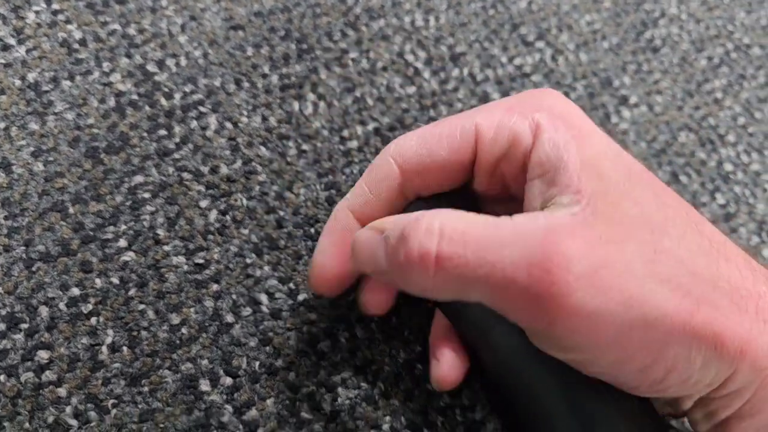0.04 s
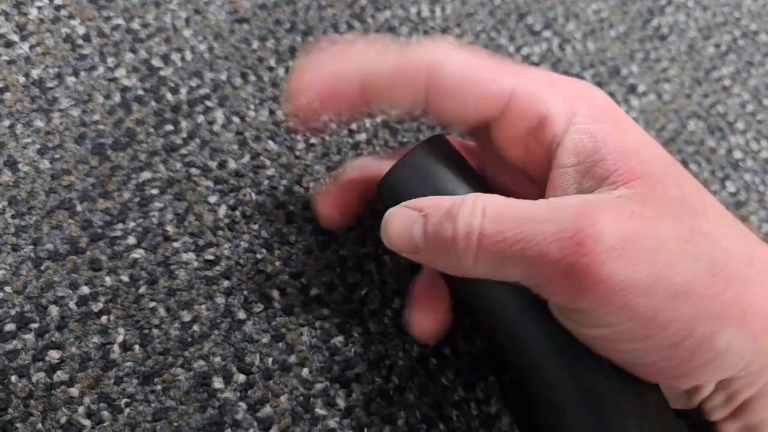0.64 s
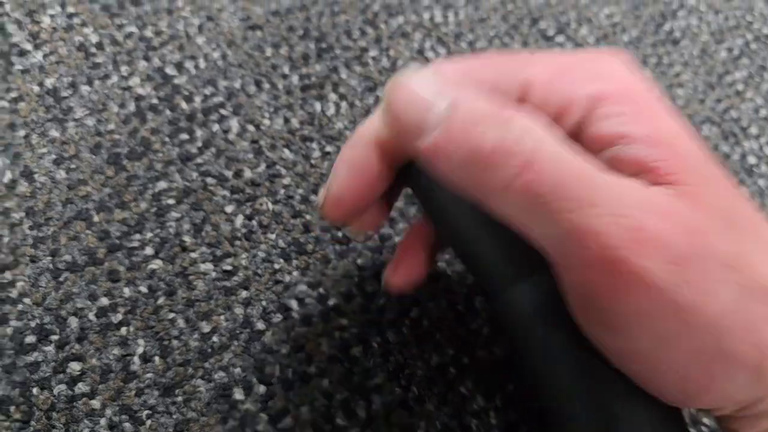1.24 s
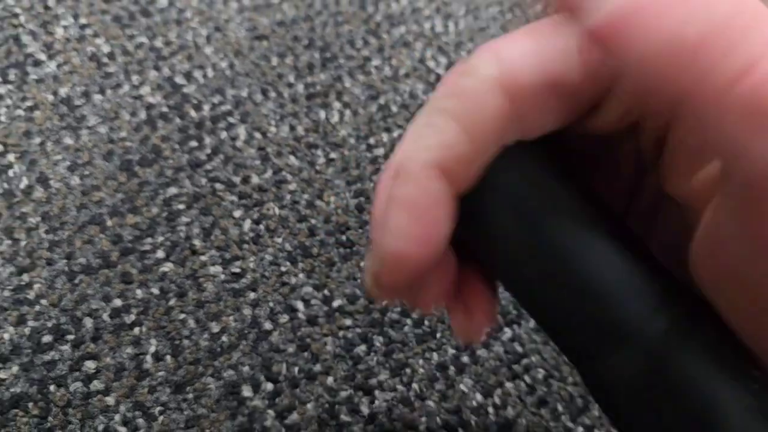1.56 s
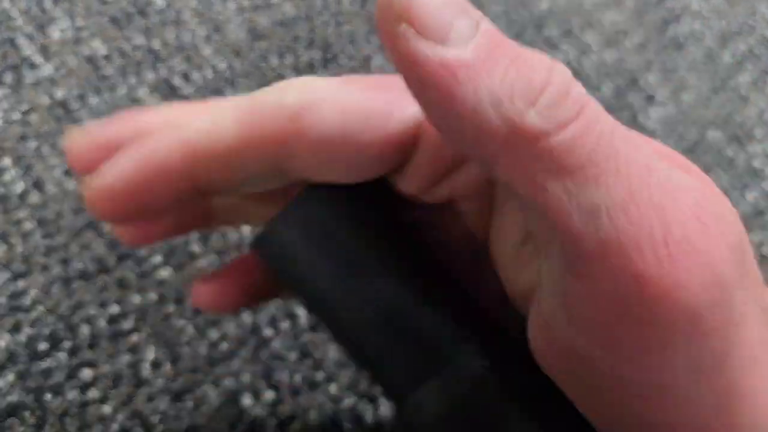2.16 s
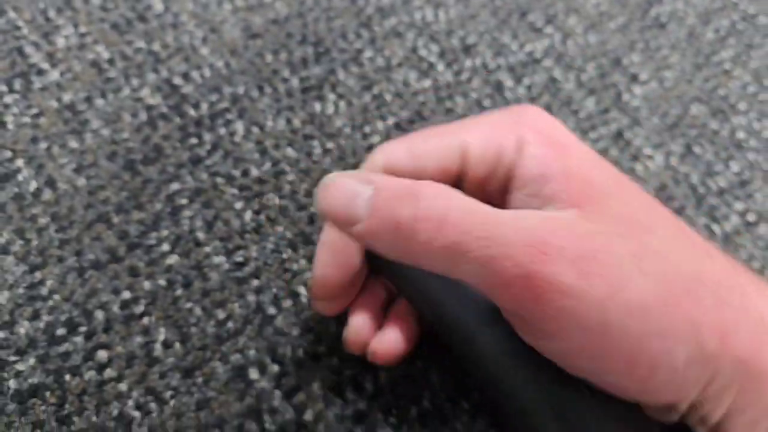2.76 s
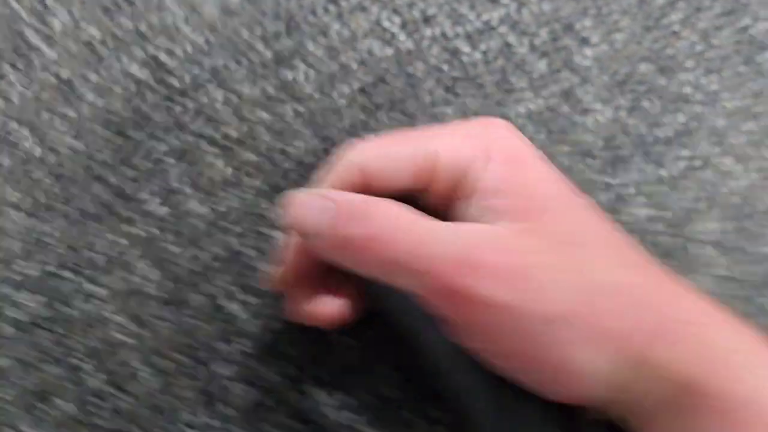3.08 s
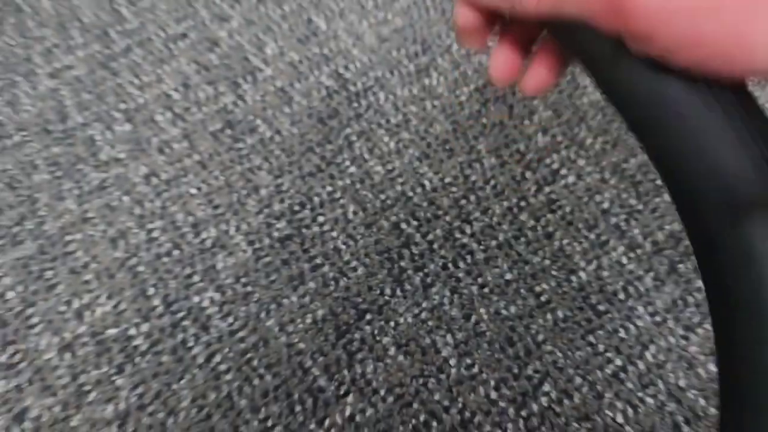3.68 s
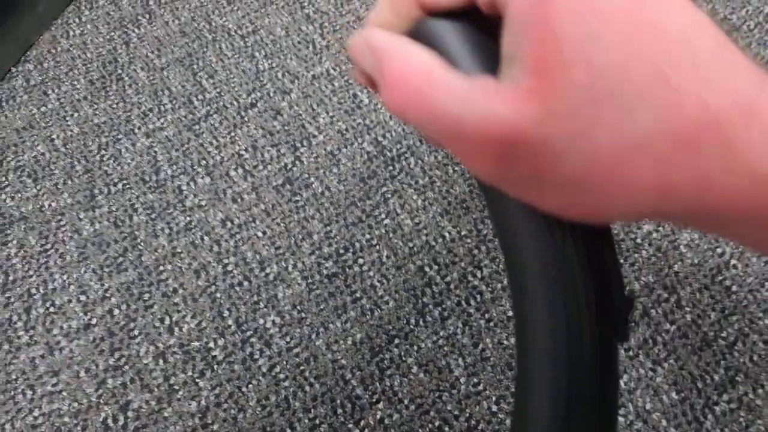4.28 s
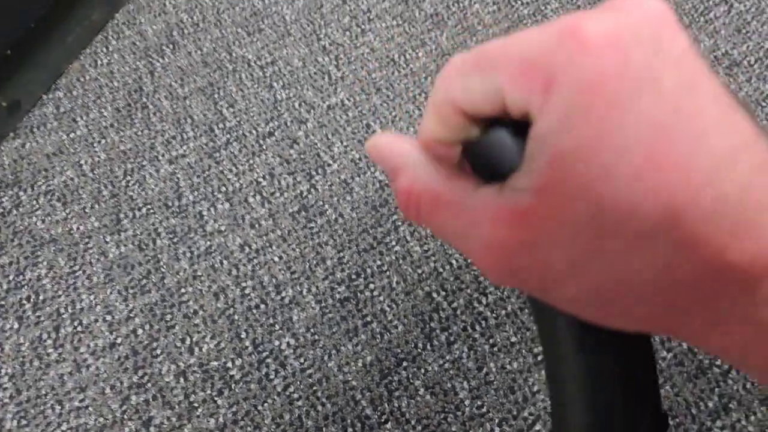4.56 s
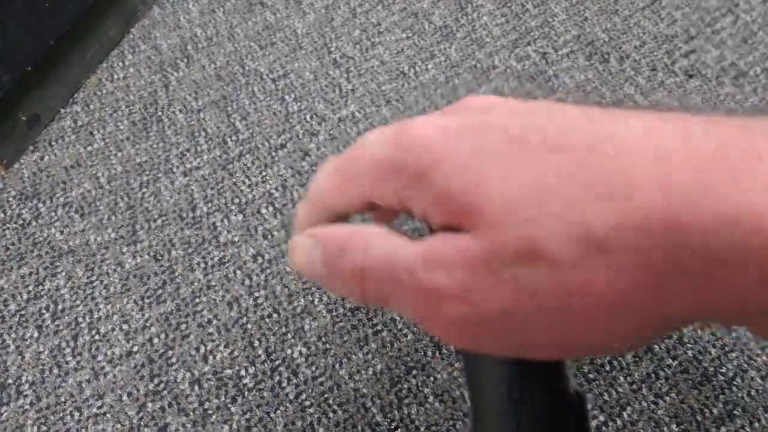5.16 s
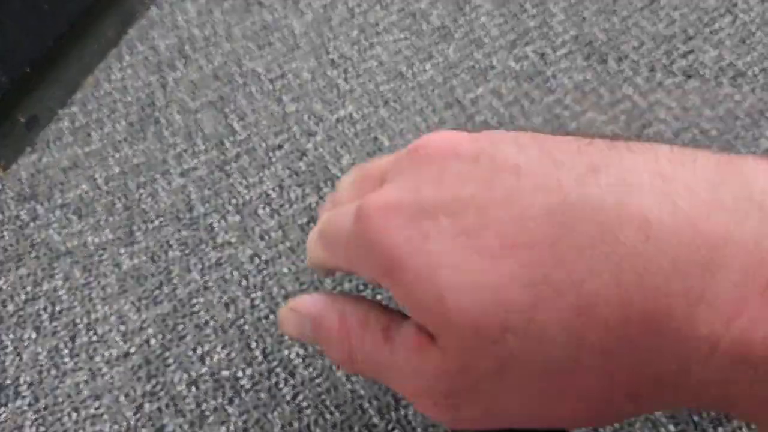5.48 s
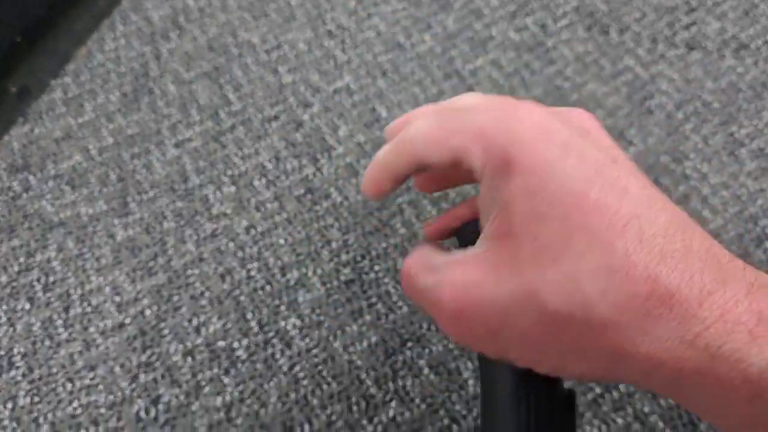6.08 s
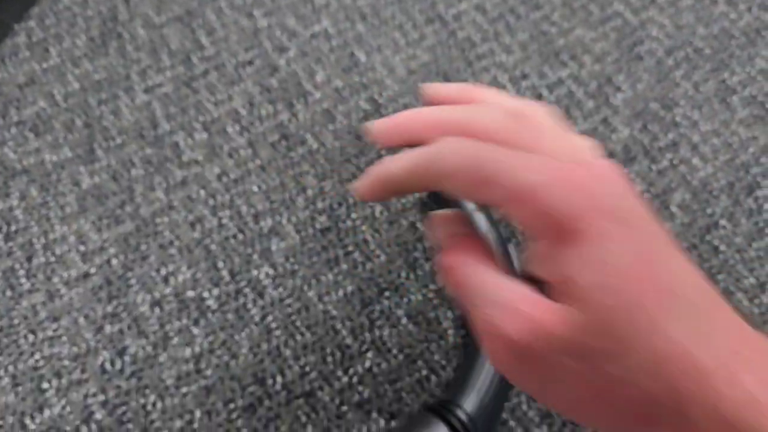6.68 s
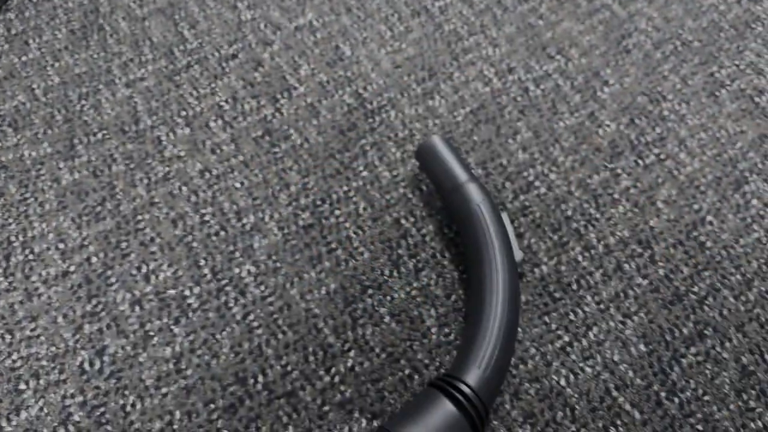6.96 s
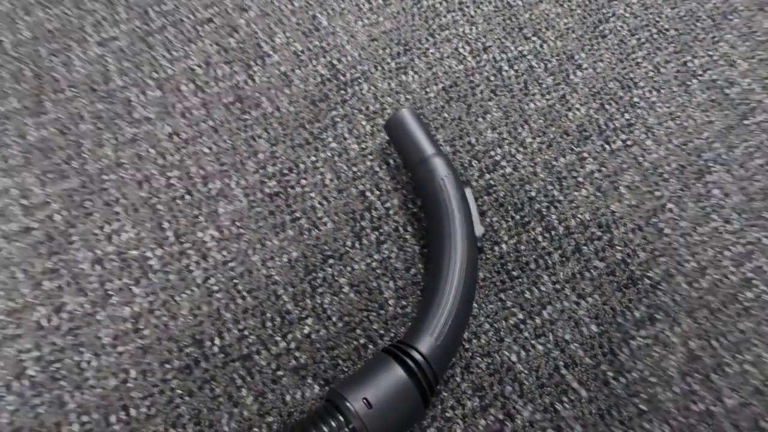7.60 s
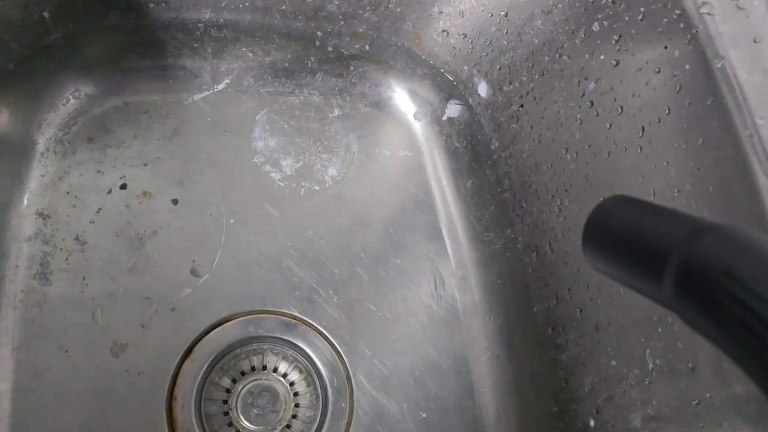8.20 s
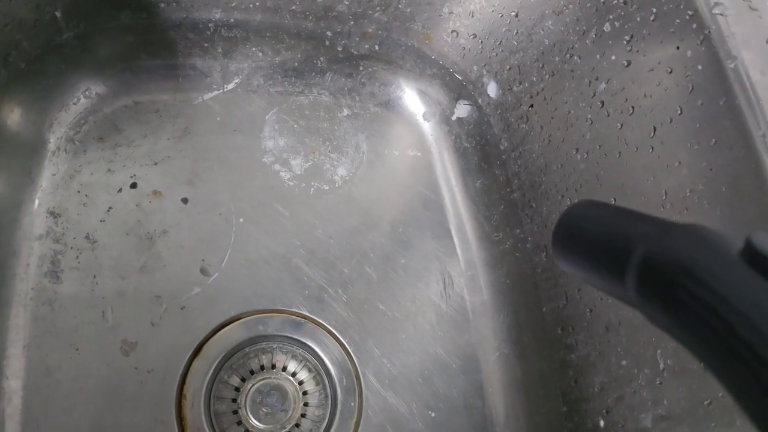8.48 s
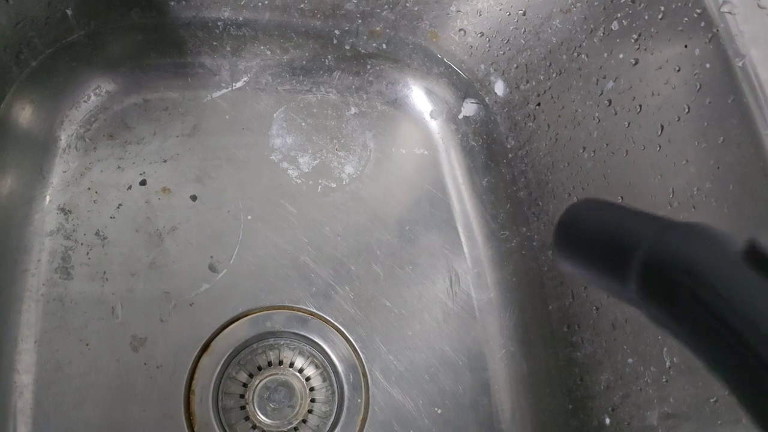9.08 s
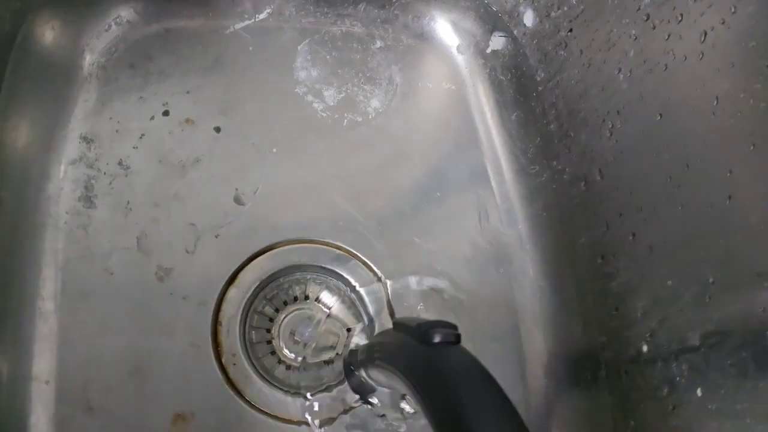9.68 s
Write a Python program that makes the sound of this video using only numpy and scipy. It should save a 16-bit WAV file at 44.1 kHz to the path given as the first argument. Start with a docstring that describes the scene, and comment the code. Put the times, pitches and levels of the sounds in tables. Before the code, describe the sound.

Air sizzles between fingers on a vacuum nozzle while the motor's hum rises and falls, before the open hose roars and gulps water.

```python
"""A wet-dry vacuum cleaner hums and hisses in a carpeted room as a hand covers and frees its nozzle.
Starved of air, the motor speeds up and its hum rises and swells. Air sizzles, hisses, rushes and
squeals through gaps between the fingers, the hose flutters, and the palm slaps onto the opening.
Then, abruptly, the open hose roars over a steel sink, with thin steady tones in its hiss, and dips
into the water at the drain, where it slurps and gulps."""
import sys
import numpy as np
from scipy import signal
from scipy.fft import rfft, irfft, next_fast_len
from scipy.io import wavfile
from scipy.ndimage import map_coordinates

SR = 44100
rng = np.random.default_rng(int(sys.argv[2]) if len(sys.argv) > 2 else 0)


def persist_wave(psi):
    """Save psi, clipped to +-1, as 16-bit WAV."""
    counts = np.round(np.clip(psi, -1, 1) * 32767).astype(np.int16)
    wavfile.write(sys.argv[1], SR, np.atleast_2d(counts).T)


N = 438354

HAND_OFF_S, SINK_S, DIP_S = 6.375, 7.74, 9.5  # the hand leaves, the sink begins, the nozzle meets water
OPEN_HZ, SEALED_HZ = 635, 720  # pitch of the hum with the nozzle open and sealed

# The hand, and last the water, blocks or frees the nozzle: (time [s], share closed from then on [0-1])
BLOCKAGES = [(0.0, 0.225), (0.064, 0.91), (0.509, 0.035), (0.819, 0.9), (0.92, 0.795), (1.33, 0.924),
             (2.129, 0.042), (2.583, 0.919), (4.639, 0.016), (5.054, 0.723), (5.193, 0.278), (5.316, 0.708),
             (5.561, 0.127), (5.9, 0.234), (6.32, 0.0), (9.616, 0.95)]
# Standing waves, the room's loud and quiet spots, make the hum depend on its pitch. Balance is left
# level minus right; lead is how far left runs ahead: (pitch [Hz], level [dB], balance [dB], lead [rad])
ROOM_WAVES = [(635.0, -33.8, 3.2, 1.5), (644.0, -26.0, 3.9, 0.4), (652.0, -28.4, -2.7, 0.1),
              (658.0, -25.9, -1.5, -0.3), (664.0, -26.3, -1.4, 0.2), (669.0, -28.5, -4.9, -0.2),
              (674.0, -25.1, -11.7, -0.1), (682.0, -23.5, -2.9, 0.8), (688.0, -24.3, 2.3, -0.1),
              (694.0, -25.0, -5.0, -0.6), (700.0, -21.8, -6.5, -0.4), (704.0, -23.6, -5.7, 0.1),
              (708.0, -18.4, -5.2, -0.3), (713.0, -16.7, -1.0, -0.8)]
# The microphone drifts through them: (time [s], added level [dB], added balance [dB], added lead [rad])
MIC_DRIFT = [(0.0, 0.2, 0, -0.57), (0.45, 2.7, 1.67, -0.52), (1.0, -5.54, -0.32, -0.69),
             (1.4, 2.8, 0.53, -0.3), (2.0, 1.7, -1.92, 0.75), (2.6, -5.5, 0.24, -0.85),
             (3.1, 3.5, -3, 0.49), (3.45, 7.78, -0.7, 0.6), (3.9, 1.52, -3.81, -0.04),
             (4.6, -0.91, 2.39, 0.22), (5.4, 1.3, 0, 0.13), (5.9, -2.5, 3, 0.06), (6.4, -1, 0, 0.27),
             (6.8, -3, 0.24, 0.072), (7.7, 1.7, 0.75, -0.04)]
# The hum dips briefly: (time [s], half length [s], depth [dB])
HUM_DIPS = [(0.524, 0.039, -14), (4.787, 0.013, -17), (4.995, .05, -9.5), (5.79, 0.015, -10),
            (6.373, 0.064, -9)]
# A tone an octave above the hum builds until the seal breaks: (time of break [s], peak level [dB])
OCTAVE_PEAKS = [(2.06, -39), (4.56, -43.5)]
# Higher tones in the hum; the twelfth comes from the motor's spinning contacts, the commutator:
# (multiple of the pitch, base level by the carpet [dB], base level by the sink [dB])
OVERTONES = [(3, -58.5, -51), (12, -59, -54)]
# Air leaks between hand and nozzle: (start [s], end [s], rush of a wide gap [dB],
# hiss of a narrow gap [dB], sizzle of a pinhole [dB], balance of the sizzle [dB])
FINGER_GAPS = [(0.0, 0.423, -37, -36, -34.5, -2), (0.416, 0.492, -37, -33, -16.5, 12),
               (0.496, 0.571, -23.5, -22.5, -28, 10), (0.566, 0.744, -32.5, -33, -35, 8),
               (0.84, 0.943, -40, -36, -29, 3), (0.935, 1.06, -45, -30.5, -19.5, 13),
               (1.142, 1.254, -56, -35, -27, 4), (2.078, 2.261, -23, -23, -22, 19),
               (2.27, 2.376, -33, -36, -42, 10), (2.447, 2.544, -29.5, -21.5, -21.5, 3),
               (3.93, 4.45, -45, -44, -32, 5), (4.056, 4.25, -48, -44, -28.5, 11),
               (4.552, 4.65, -29, -23, -20, 9), (4.618, 4.722, -21.5, -24, -26, 7),
               (4.728, 4.907, -30, -39.5, -52, 4), (4.895, 4.946, -25, -27.5, -34, 5),
               (5.114, 5.235, -28, -27.5, -32, 4), (5.248, 5.47, -48, -39.5, -35, 2),
               (5.47, 5.58, -29, -25.5, -32, 9), (5.56, 6.225, -23.5, -27, -32.5, 10),
               (5.644, 5.678, -20, -38, -42, 5), (5.747, 5.916, -21.5, -27.5, -37, 5),
               (6.07, 6.158, -44, -35, -26, 8), (6.182, 6.215, -23.5, -40, -36, 6),
               (6.227, 6.373, -29.5, -33.5, -44, 3)]
# The bare nozzle turns toward the microphone: (time [s], rush [dB], hiss [dB], sizzle [dB])
BARE_NOZZLE = [(6.45, -33.5, -54, -58), (7.0, -32.5, -51, -54), (7.72, -30.5, -43.5, -45)]
# Slits between the fingers almost whistle:
# (start [s], end [s], first pitch [Hz], last pitch [Hz], band width [Hz], level [dB], balance [dB])
SQUEALS = [(0.022, .95, 6340, 6400, 350, -40.5, 0), (.05, .42, 14800, 14000, 1500, -33, -3),
           (1.3, 2.08, 13400, 14900, 1400, -33.5, -5), (2.92, 3.2, 13600, 13000, 900, -39, -6),
           (3.3, 3.92, 14200, 14800, 1200, -38, -11), (3.95, 4.3, 13000, 13500, 1400, -32, 6),
           (0.432, 0.573, 7480, 4900, 1200, -19.5, 3), (0.96, 1.09, 14900, 13100, 1600, -15.5, 14),
           (2.109, 2.28, 1850, 1530, 380, -21.5, 24), (2.268, 2.48, 2220, 2170, 220, -32, 9),
           (2.465, 2.568, 2264, 2120, 260, -23.5, 5), (4.613, 4.759, 3300, 2013, 1100, -22, 8),
           (4.96, 5.03, 7500, 7400, 500, -36, 5), (5.11, 5.373, 7500, 7130, 600, -29.5, 5),
           (5.1, 5.5, 12600, 12100, 800, -35, 3), (6.17, 6.23, 3550, 3430, 500, -27, 8),
           (5.744, 5.831, 1930, 1884, 220, -17, 10), (5.8, 6.13, 2086, 1995, 300, -22, 10),
           (5.947, 6.355, 2910, 3510, 1000, -27, 3)]
# Air flutters in the hose, before a strong flow calms it: (time [s], level [dB])
HOSE_FLUTTER = [(1.0, -39), (4.8, -39.5), (5.0, -43), (5.5, -41.5), (5.8, -38.5), (7.7, -36.5)]
# The hose shudders as the flow changes: (start [s], end [s], level [dB])
HOSE_SHUDDERS = [(.04, .43, -39), (0.565, 0.687, -28.5), (2.25, 2.418, -31.5), (4.717, 4.8, -37)]
# The palm slaps onto the nozzle: (time [s], puff [dB], thump [dB], thump pitch [Hz])
PALM_SLAPS = [(.7, -14, -42, 90), (.718, -18, -35, 50), (2.394, -38, -24, 212), (2.402, -15, -12.5, 59.3)]
# The hand sweeps away and stirs the air: (start [s], end [s], level [dB])
HAND_WAFT = (6.62, 6.85, -43)
# The hum as heard at the sink: (time [s], level [dB], balance [dB], lead [rad])
HUM_AT_SINK = [(7.75, -16.5, 12, 0.2), (9.2, -16, 12.5, -.4), (9.45, -14.5, 11, 0.8),
               (9.52, -20.5, 12, -1.7), (9.6, -14.5, 12, -2.5), (9.75, -25.5, 0, -1.5),
               (9.82, -16.5, 2, -1.5), (9.92, -15.5, 0, -1.5)]
# Narrow ringing pitches in the hiss at the sink, with thin, steady, electronic-sounding tones
# near 4, 5.2 and 9 kHz: (pitch [Hz], width [Hz], relative strength [dB])
NARROW_TONES = [(2490, 120, -4.5), (3450, 130, 4), (3760, 80, -9), (4002, 86, 5), (4630, 120, 2),
                (5220, 70, 1), (7346, 70, -1), (8999, 60, 5)]
# Slugs of water enter the hose: (time [s], splash [dB], thump [dB], thump pitch [Hz])
WATER_GULPS = [(9.518, -18, -38, 150), (9.545, -16, -34, 121.4), (9.612, -20, -9.5, 180),
               (9.772, -30, -10.5, 108)]

# The tone colour of each air noise, from bass to treble: (frequency [Hz], relative level [dB])
EXHAUST_COLOUR = [(120, -20), (290, -3), (400, -8), (520, -13), (850, -18.5), (1050, -4), (1280, -9),
                  (1480, 1.5), (1620, -6), (2050, -3.5), (2550, -1), (3100, -7), (6000, -9.5), (9200, -6.5),
                  (11000, -13), (14300, -11.5), (15700, -12)]
RUSH_COLOUR = [(100, -41), (250, -26.5), (370, -12.5), (550, -10.5), (800, -7.5), (1050, -10.5), (1300, -2),
               (1650, -3), (1830, -0.5), (1960, 1), (2100, 0.5), (2550, -6), (2900, -3.5), (3500, -13.5),
               (4600, -15.5), (8000, -30)]
HISS_COLOUR = [(2200, -17), (3500, 3.5), (5000, 3), (7300, 2.5), (9500, 4), (11000, -9), (14000, -2.5)]
SIZZLE_COLOUR = [(7000, -20), (10500, -5.5), (12000, -2), (13000, 3), (14500, -0.5), (15800, 3)]
FLUTTER_COLOUR = [(30, -18), (65, -10), (110, -1.5), (160, 0.5), (270, -2.5), (350, -5.5), (550, -2.5),
                  (850, -4), (1200, -14), (2500, -52)]
WAFT_COLOUR = [(30, -24), (68, 2), (110, -10), (300, -50)]
ROAR_COLOUR = [(25, -35), (45, -25), (70, -4.5), (102, -5), (130, 1), (162, -5), (180, -4.5), (198, -2.5),
               (218, -2.5), (300, -16), (450, -19), (1000, -39)]
INTAKE_COLOUR = [(100, -25), (250, -11), (350, -8), (440, 6), (520, -3.5), (690, 12.5), (790, -0.5),
                 (900, 9), (1100, 1), (1500, -5), (2000, 0), (3800, -2), (5200, -1.5), (6500, -12),
                 (10000, -18.5)]
SLURP_COLOUR = [(250, -1), (480, 5), (700, 6), (1050, 0.5), (1420, 0.5), (1650, -0.5), (2300, -1),
                (3500, -0.5), (5200, -2.5), (7000, -5.5), (10000, -17)]
SPRAY_COLOUR = [(3500, -31), (6200, 0), (8500, 2.5), (10500, 1), (12500, -2.5), (15800, 1.5)]
SLAP_COLOUR = [(150, 10.0), (1000, 3), (2300, 4.5), (7000, 1.5), (15000, -2)]
GULP_COLOUR = [(300, -1), (2000, -2), (4000, 6), (8000, 2), (15000, -8)]
# How alike air noise is on the left and right: (frequency [Hz], likeness [0-1])
STEREO_LIKENESS = [(200, 0.99), (400, 0.85), (900, 0.16), (2000, 0.14), (4000, 0), (12000, 0)]
# The left microphone opening loses a slice of the treble: (frequency [Hz], balance [dB])
MIC_BALANCE = [(5000, 0), (6000, 3), (8500, 0), (9600, 1.5), (11000, -14), (12200, 0.5)]

TIME = np.arange(N) / SR  # seconds at each sample


def amp(db):
    """Turn decibels into a number to multiply by."""
    return 10 ** (np.asarray(db) / 20)


def unit(x):
    """Scale a sound to an average power of 1."""
    return x / np.sqrt(np.mean(x ** 2) + 1e-20)


def along(points, hz):
    """Read between (frequency, value) points, with octaves evenly spaced."""
    point_hz, values = np.transpose(points)
    return np.interp(np.log(hz + 1), np.log(point_hz + 1), values)


def curves(rows, at=TIME):
    """Read the other columns of a table at given values of its first, by default every sample's time."""
    first, *columns = np.transpose(rows)
    return [np.interp(at, first, column) for column in columns]


def wobble(rate):
    """A smooth random curve through rate new values a second."""
    return map_coordinates(rng.standard_normal(int(N * rate / SR) + 4), [TIME * rate])


def gate(start, end, rise_s=0.031, fade_s=0.028):
    """A loudness shape that opens, holds and dies away."""
    return np.clip((TIME - start) / rise_s, 0, 1) * np.exp(-np.clip((TIME - end) / fade_s, 0, 20))


def filtered(x, response):
    """Turn each frequency up or down by response(hz)."""
    size = next_fast_len(N + 8192)
    return irfft(rfft(x, size) * response(np.fft.rfftfreq(size, 1 / SR)), size)[..., :N]


def panned(balance_db):
    """Left and right gains that move a sound sideways and keep its power."""
    gains = amp(np.array([[.5], [-.5]]) * balance_db)
    return gains / np.sqrt(np.mean(gains ** 2, axis=0))


def air(colour):
    """Swirling air: stereo noise, alike on both sides in the bass and unrelated in the treble."""
    def response(hz):
        spread = np.arccos(np.clip(along(STEREO_LIKENESS, hz), -1, 1)) / 2
        return amp(along(colour, hz)) * [np.cos(spread), np.sin(spread)]
    mid, side = filtered(rng.standard_normal((2, N)), response)
    return unit(np.array([mid + side, mid - side]))


def motor_speed(spin_up_s=0.359, spin_down_s=0.261):
    """The motor glides to a new speed after each change of blockage: 0 at full flow, 1 when sealed."""
    speed = np.full(N, float(BLOCKAGES[0][1]))
    for when, closed in BLOCKAGES[1:]:
        i = int(when * SR)
        glide_s = spin_up_s if closed > speed[i] else spin_down_s
        speed[i:] = closed + (speed[i] - closed) * np.exp(-TIME[:N - i] / glide_s)
    return speed


def fan_pitch(speed):
    """The less air the fan moves, the higher it sings."""
    return OPEN_HZ + (SEALED_HZ - OPEN_HZ) * speed


def hum_in_room(speed):
    """Level, balance and lead of the hum as its pitch sweeps through the room's standing waves."""
    hz = fan_pitch(speed)
    db, balance_db, lead = np.add(curves(ROOM_WAVES, at=hz), curves(MIC_DRIFT))
    # For the first 3.6 s the microphone sits in a quiet spot for one pitch.
    quiet_spot_db = -11 * (TIME < 3.6) * np.exp(-((hz - 668.3) / 2.6) ** 2)
    dips_db = sum(depth * np.exp(-((TIME - when) / half) ** 2) for when, half, depth in HUM_DIPS)
    return db + quiet_spot_db + dips_db, balance_db, lead


def octave_swell(db_per_s=26):
    """Strength of the starved fan's octave: it grows while the seal lasts and dies when it breaks."""
    return sum(amp(db + db_per_s * np.minimum(TIME - end, 0)) * gate(0, end) for end, db in OCTAVE_PEAKS)


def fan_hum(speed, heard, overtones, shake, waver_hz, strain_db=5.5, pipe_hz=1982):
    """The fan sings at a pitch set by the motor speed; swirling air makes the tone tremble."""
    hz = fan_pitch(speed)
    db, balance_db, lead = heard
    phase = 2 * np.pi * np.cumsum(hz + waver_hz * wobble(14)) / SR
    ears = panned(balance_db) * np.exp(1j * np.array([[.5], [-.5]]) * lead)
    flow = 1 - .9 * speed
    tremble = shake * flow * np.array([wobble(70) + 1j * wobble(81) for ear in range(2)])
    tone = amp(db) * np.real((ears + tremble) * np.exp(1j * phase))
    tone += octave_swell() * np.sin(2 * phase)
    for multiple, base_db in overtones:
        pipe_boost = 1 + 0.74 / (1 + ((multiple * hz - pipe_hz) / 60) ** 2)  # near the pipe's own pitch
        flicker_db = 4.1 * np.array([wobble(11), wobble(12)])
        tone += pipe_boost * amp(base_db + strain_db * speed + flicker_db) * np.sin(multiple * phase)
    return np.sqrt(2) * tone


def exhaust():
    """Air blows steadily out of the machine."""
    return amp(-34.5) * air(EXHAUST_COLOUR) * panned(0.25)


def leak_strengths(speed):
    """How much air rushes, hisses and sizzles under the hand, through its gaps and at the bare nozzle."""
    held = gate(-1, HAND_OFF_S)
    # Unrelated noises add by power, so square, add, and take the root at the end.
    rush, hiss, sizzle = [(1 - held ** 2) * amp(db) ** 2 for db in curves(BARE_NOZZLE)]
    rush = rush + amp(-43.5 + 5 * speed) ** 2  # the pipe always rushes a little
    hiss = hiss + (held * amp(-44)) ** 2  # air seeps past the hand
    sizzle = sizzle + (held * amp(-36.5) * panned(-2.5)) ** 2
    for start, end, rush_db, hiss_db, sizzle_db, balance_db in FINGER_GAPS:
        power = gate(start, end) ** 2
        rush += power * amp(rush_db) ** 2
        hiss += power * amp(hiss_db) ** 2
        sizzle += power * (amp(sizzle_db) * panned(balance_db)) ** 2
    return np.sqrt(rush), np.sqrt(hiss), np.sqrt(sizzle)


def nozzle_jets(rush, hiss, sizzle):
    """Air shoots into the nozzle: wide gaps rush, narrow gaps hiss and pinholes sizzle."""
    jets = amp(2) * rush * air(RUSH_COLOUR) * panned(6)
    jets += amp(4) * hiss * air(HISS_COLOUR) * panned(1.1)
    jets += amp(6) * sizzle * air(SIZZLE_COLOUR)
    return jets * amp(1.02 * wobble(55))  # the jets flap against the skin


def palm_echo(x, share=0.18, delay_s=0.000996):
    """The moving palm throws the sound back a moment later, making it hollow and shifting."""
    lag = delay_s * SR * np.exp(0.139 * wobble(3))
    echo = np.array([map_coordinates(ear, [np.arange(N) - lag]) for ear in x])
    return (x + share * echo) / np.sqrt(1 + share ** 2)


def wall_echoes(x, share, spread_s, count=14):
    """Weak, quick echoes off nearby surfaces colour the left and right sides differently."""
    out = x.copy()
    for ear in range(2):
        for when, size in zip(rng.random(count), rng.standard_normal(count)):
            lag = int((.001 + when * spread_s) * SR)
            out[ear, lag:] += share * size / np.sqrt(count) * x[ear, :N - lag]
    return out / np.sqrt(1 + share ** 2)


def finger_squeals():
    """A slit between the fingers almost whistles: a narrow band of noise that slides in pitch."""
    out = np.zeros((2, N))
    for start, end, from_hz, to_hz, width_hz, db, balance_db in SQUEALS:
        first, length = int(start * SR), int((end - start) * SR)
        progress = np.linspace(0, 1, length)
        noise = rng.standard_normal((2, length)) + 1j * rng.standard_normal((2, length))
        slow_noise = signal.lfilter(*signal.butter(2, width_hz / SR), noise)
        phase = 2 * np.pi * np.cumsum(from_hz + (to_hz - from_hz) * progress ** 2) / SR
        whistle = unit(np.real(slow_noise * np.exp(1j * phase)))  # lifts the noise up to the pitch
        swell = np.sqrt(np.abs(np.sin(np.pi * progress)))
        out[:, first:first + length] += amp(db) * panned(balance_db) * swell * whistle
    return out


def hose_flutter(rush, calm_db=-21.5):
    """The hose flutters and shudders; a rush as strong as calm_db halves the flutter."""
    flutter_db, = curves(HOSE_FLUTTER)
    flutter = amp(flutter_db + 1.3 * wobble(12)) / (1 + (rush / amp(calm_db)) ** 2)
    shudders = sum(amp(db) * gate(start, end) for start, end, db in HOSE_SHUDDERS)
    return np.hypot(flutter, shudders) * air(FLUTTER_COLOUR)


def sudden_plugs(rows, colour, puff_s, ring_s, lag_s):
    """Palm or water plugs the nozzle: a puff, then a thump as the air in the hose bounces back."""
    puffs, thumps = np.zeros(N), np.zeros(N)
    for when, puff_db, thump_db, hz in rows:
        since = TIME - when
        puffs += amp(puff_db) * np.exp(-(since / puff_s) ** 2)
        age = np.maximum(since - lag_s, 0)
        swell = age / ring_s * np.exp(1 - age / ring_s)
        thumps += amp(thump_db) * swell * np.sin(2 * np.pi * hz * age)
    return puffs * air(colour) + thumps


def hand_waft():
    """The hand sweeps away and pushes a low puff of air at the microphone."""
    start, end, db = HAND_WAFT
    return amp(db) * gate(start, end) * air(WAFT_COLOUR)


def choked_db(in_air_db, in_water_db, choke_s=0.023):
    """A level that drops quickly as water chokes the nozzle."""
    return np.interp(TIME, [DIP_S, DIP_S + choke_s], [in_air_db, in_water_db])


def hose_roar():
    """Air at full flow makes the hose roar deeply, surging at random."""
    return amp(choked_db(-20.5, -28.5) + 1.2 * wobble(18)) * air(ROAR_COLOUR)


def narrow_tone_boost(hz):
    """Boost a few narrow pitches so that thin, steady tones stand out of the hiss."""
    return 1 + sum(1.44 * amp(db) / (1 + (2 * (hz - pitch) / width) ** 2)
                   for pitch, width, db in NARROW_TONES)


def sink_intake():
    """Sucked-in air hisses with thin tones in it, then slurps as water tears into drops in the nozzle."""
    wet = np.clip(1 + (TIME - DIP_S) / 0.54, 0.22, 1)  # the slurp's share grows just before the dip
    hiss = unit(filtered(air(INTAKE_COLOUR), narrow_tone_boost))
    slurp = unit(air(SLURP_COLOUR) * amp(0.92 * wobble(35) + 1.2 * wobble(300)))
    return amp(choked_db(-17, -20)) * (np.sqrt(1 - wet) * hiss + np.sqrt(wet) * slurp)


def water_spray():
    """Spray at the nozzle makes a high, flickering hiss."""
    return amp(choked_db(-18, -20.5) + wobble(60)) * air(SPRAY_COLOUR)


def on_carpet(speed):
    """The machine runs in the carpeted room while the hand plays with its nozzle."""
    rush, hiss, sizzle = leak_strengths(speed)
    airflow = palm_echo(nozzle_jets(rush, hiss, sizzle)) + exhaust()
    hose = hose_flutter(rush)
    overtones = [(multiple, db) for multiple, db, _ in OVERTONES]
    hum = fan_hum(speed, hum_in_room(speed), overtones, shake=0.27, waver_hz=0.296)
    slaps = sudden_plugs(PALM_SLAPS, SLAP_COLOUR, puff_s=0.0071, ring_s=0.0037, lag_s=0.0109)
    hand = slaps + hand_waft() + finger_squeals()
    return hum + hose + hand + wall_echoes(airflow, share=0.48, spread_s=0.012)


def at_sink(speed):
    """The open hose roars over the sink, then dips in and gulps water."""
    roar = hose_roar()
    airflow = sink_intake() + water_spray()
    overtones = [(multiple, db) for multiple, _, db in OVERTONES]
    hum = fan_hum(speed, curves(HUM_AT_SINK), overtones, shake=0.046, waver_hz=0.29)
    gulps = sudden_plugs(WATER_GULPS, GULP_COLOUR, puff_s=0.0087, ring_s=0.0042, lag_s=0)
    return hum + roar + gulps + wall_echoes(airflow, share=0.69, spread_s=0.014) * panned(1.0)


def scene():
    """The carpeted room gives way to the sink all at once."""
    speed = motor_speed()
    return np.where(TIME >= SINK_S, at_sink(speed), on_carpet(speed))


def record(dry, top_hz=15750):
    """The two microphone openings colour the treble differently; nothing above top_hz is kept."""
    return filtered(dry, lambda hz: panned(along(MIC_BALANCE, hz)) * (hz < top_hz))


dry = scene()
out = record(dry)
persist_wave(out)
```